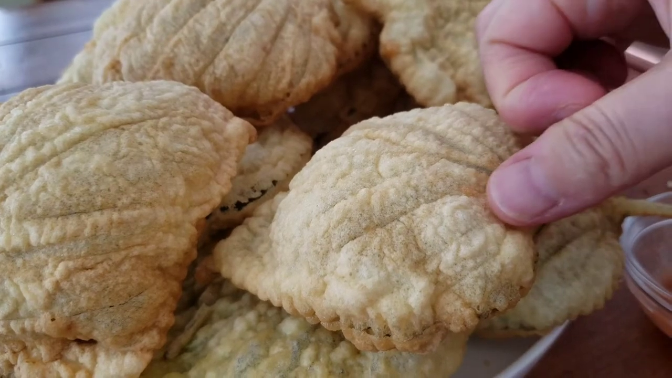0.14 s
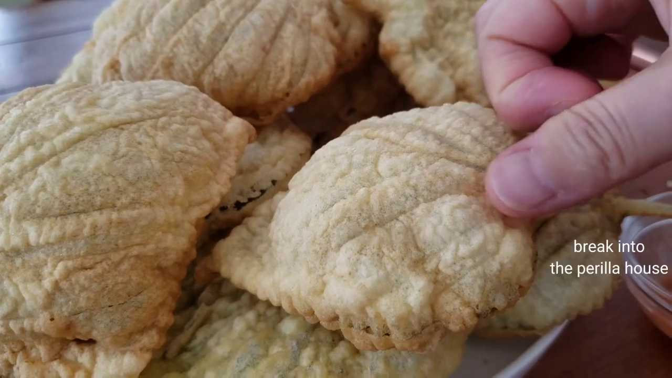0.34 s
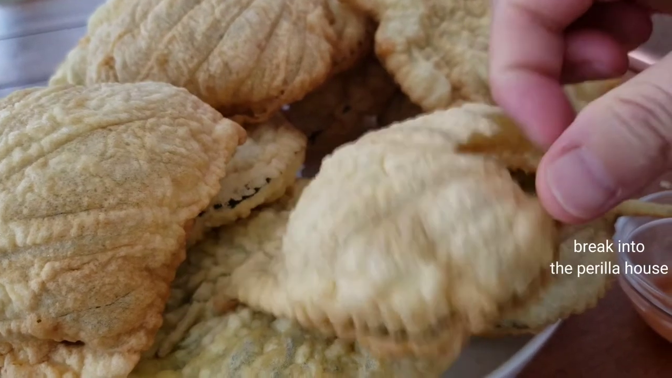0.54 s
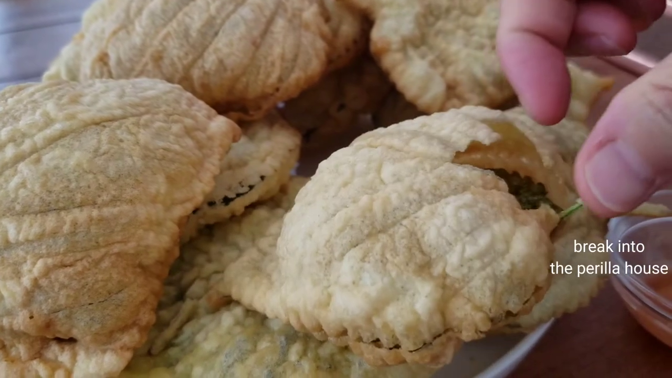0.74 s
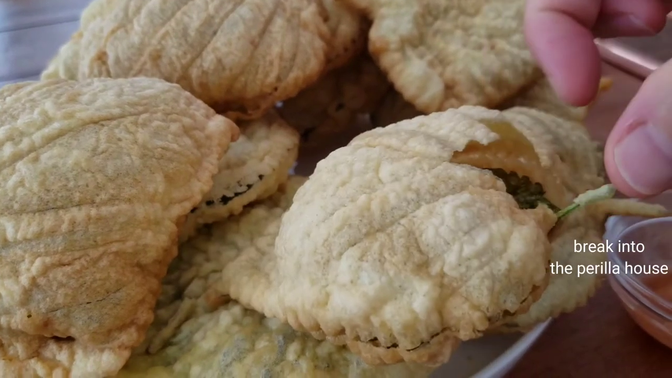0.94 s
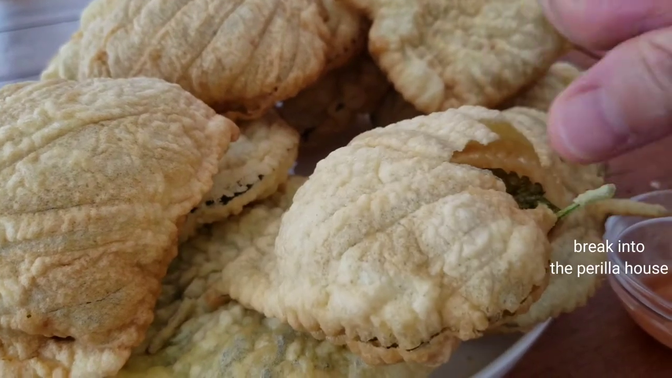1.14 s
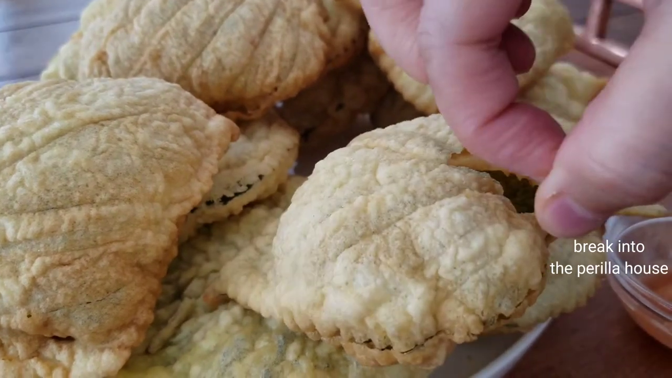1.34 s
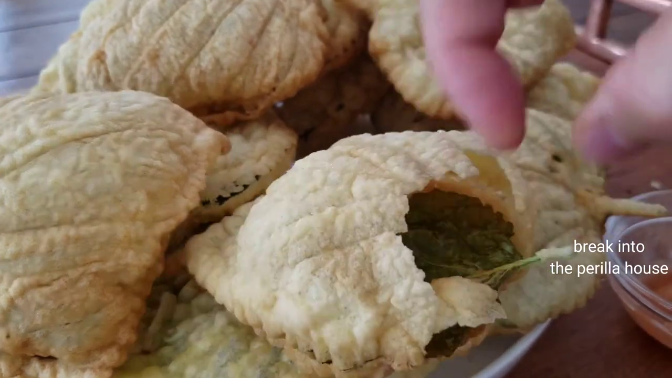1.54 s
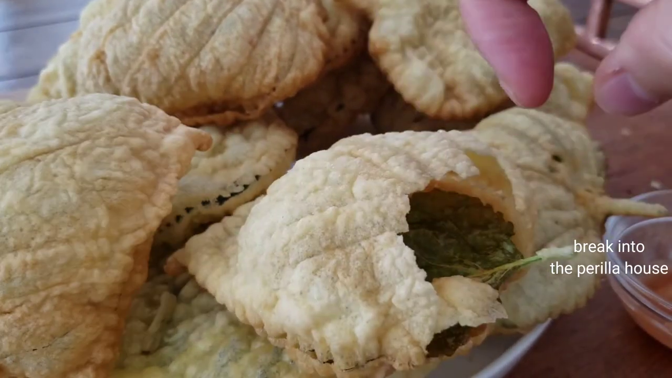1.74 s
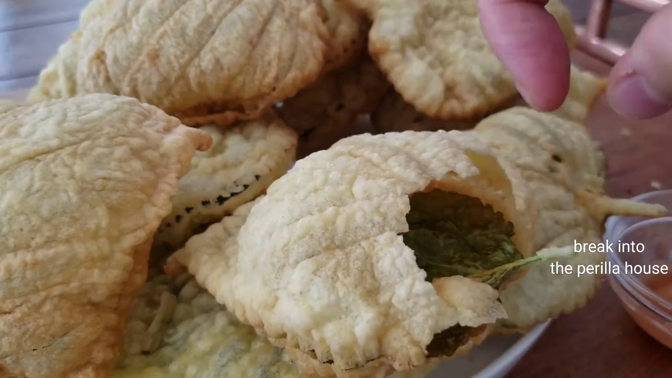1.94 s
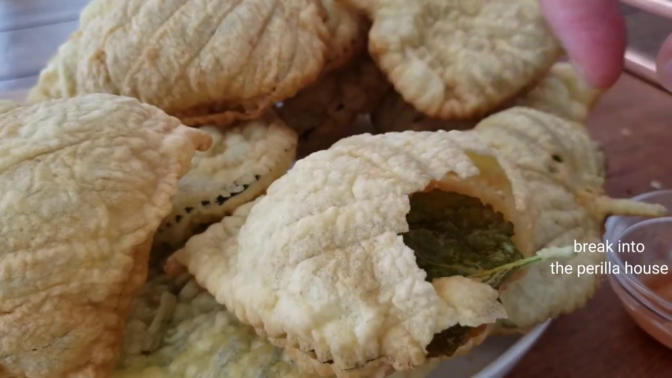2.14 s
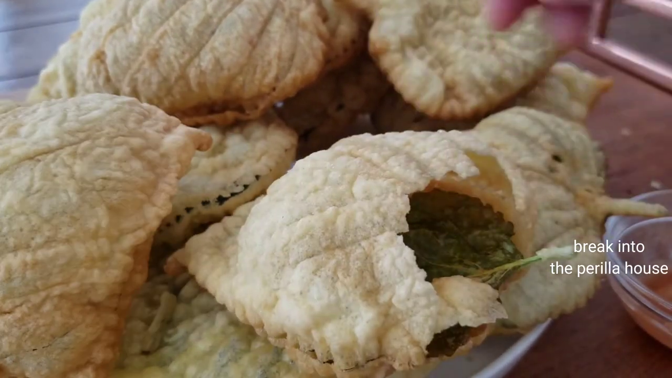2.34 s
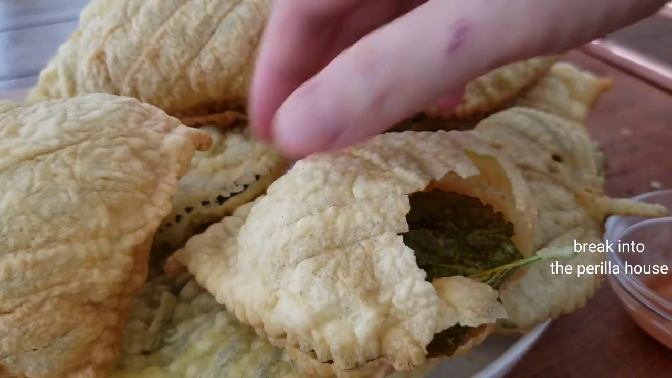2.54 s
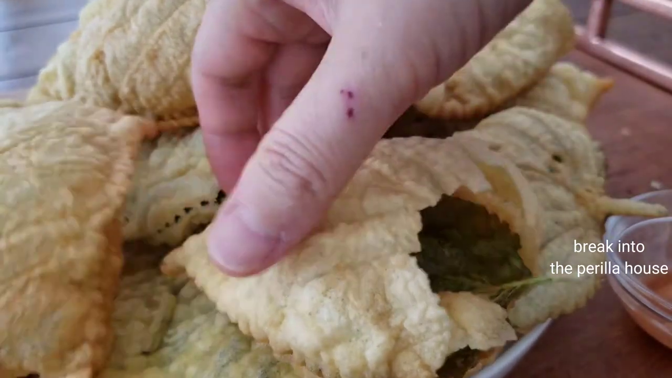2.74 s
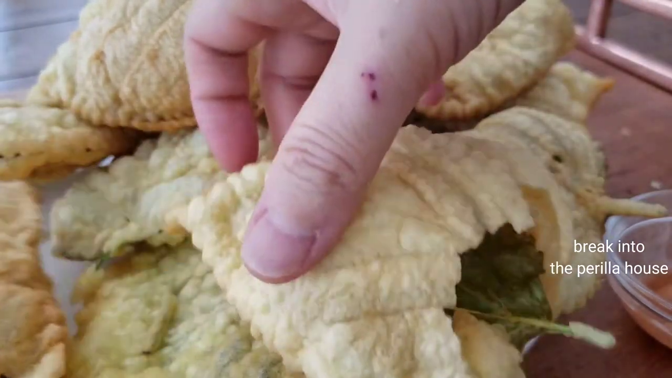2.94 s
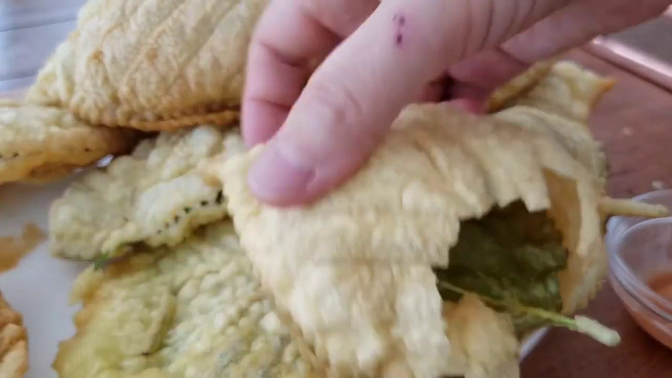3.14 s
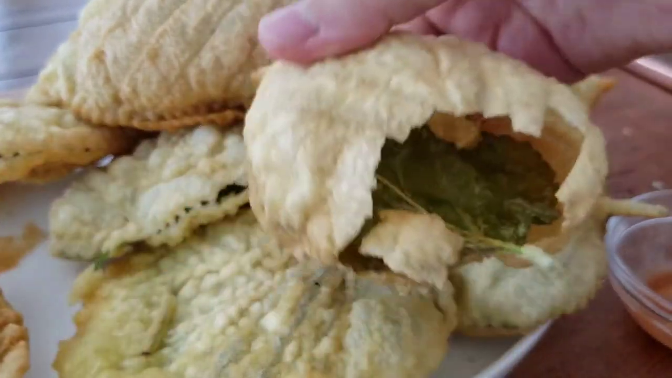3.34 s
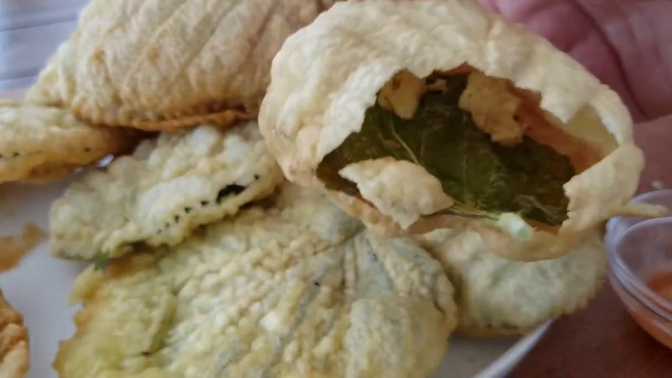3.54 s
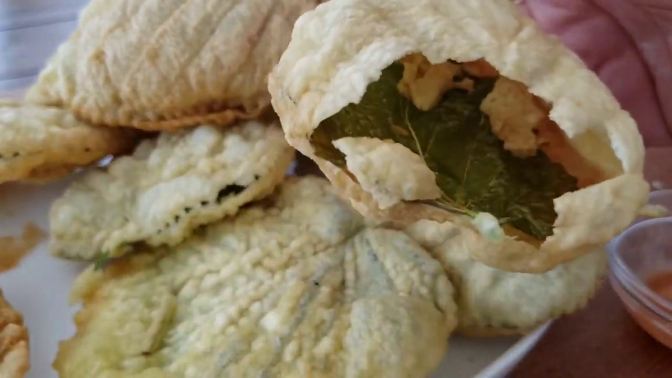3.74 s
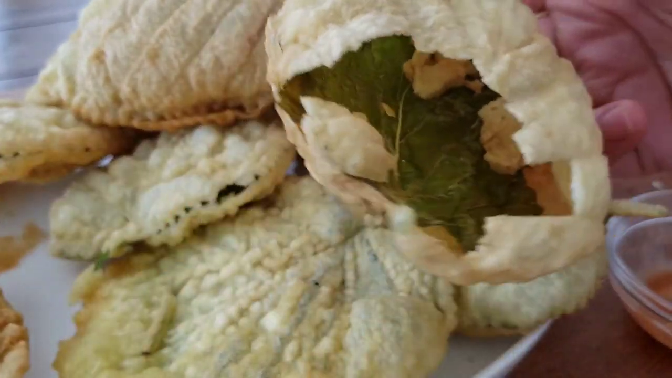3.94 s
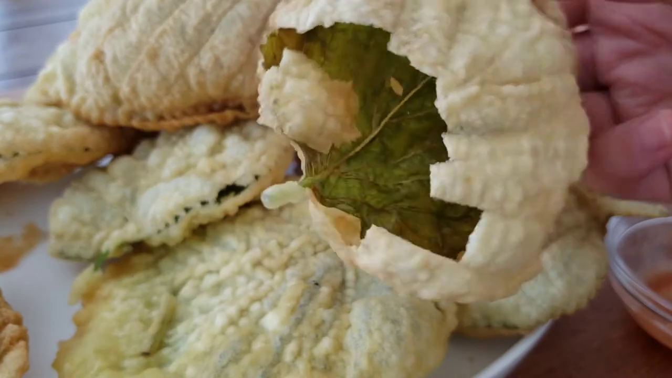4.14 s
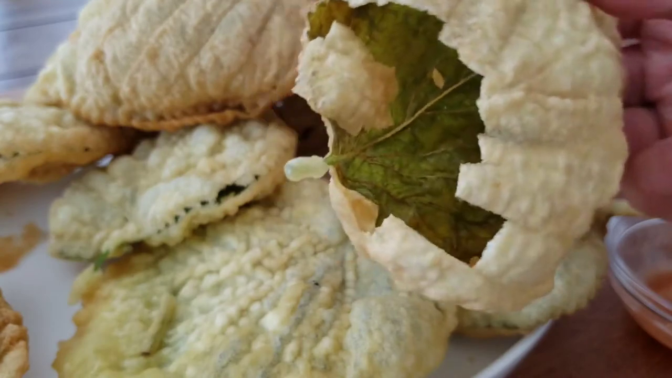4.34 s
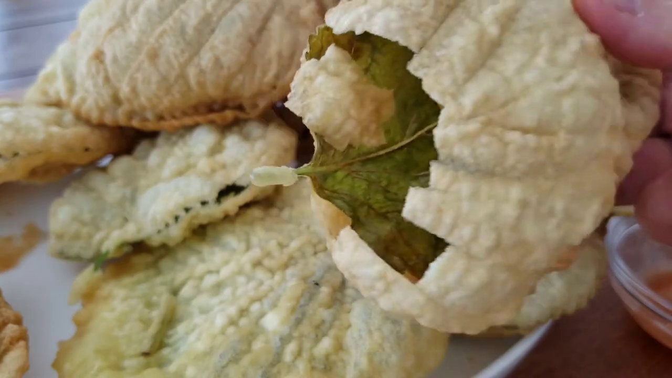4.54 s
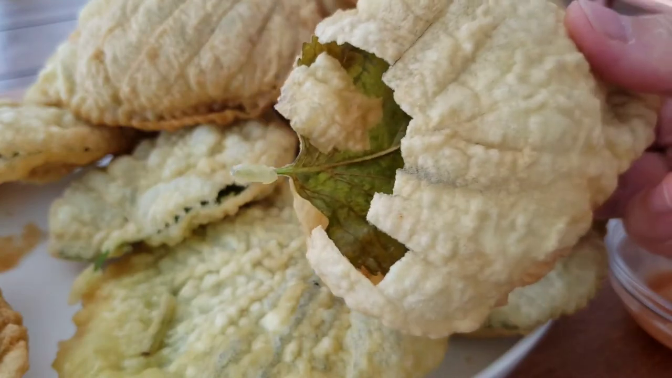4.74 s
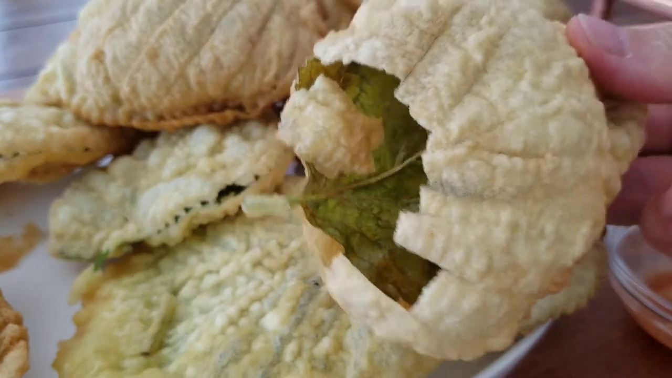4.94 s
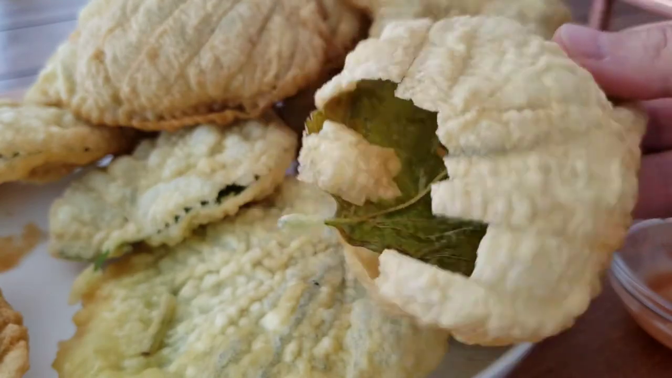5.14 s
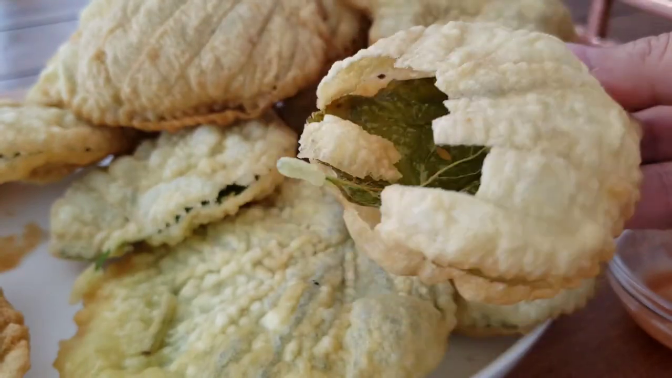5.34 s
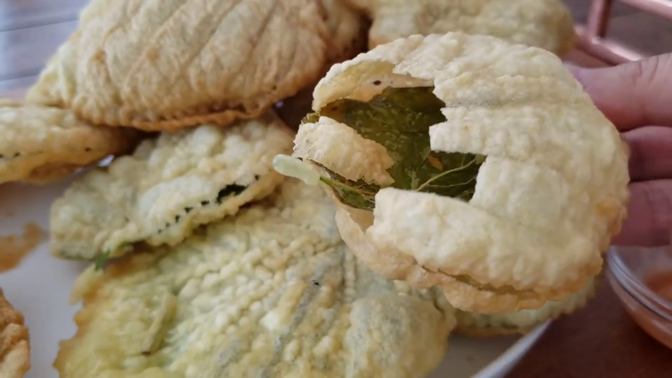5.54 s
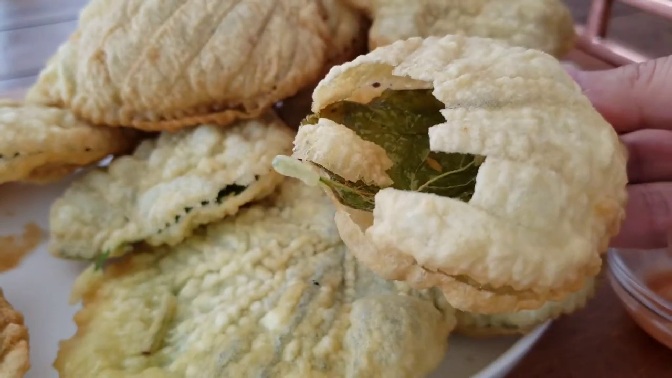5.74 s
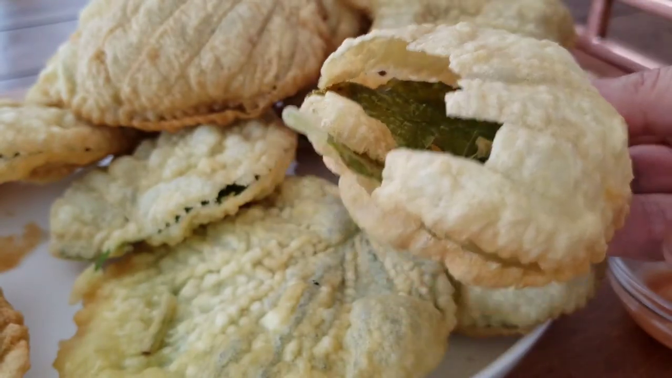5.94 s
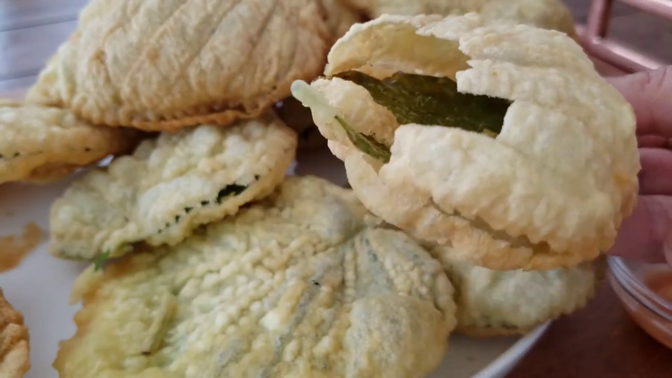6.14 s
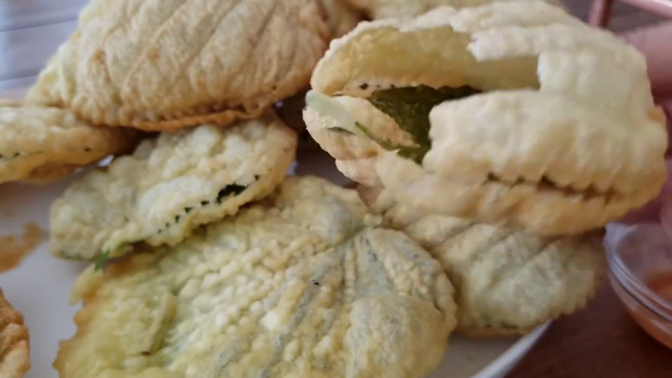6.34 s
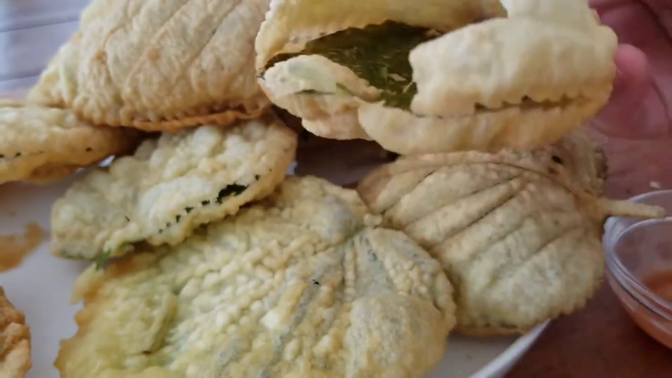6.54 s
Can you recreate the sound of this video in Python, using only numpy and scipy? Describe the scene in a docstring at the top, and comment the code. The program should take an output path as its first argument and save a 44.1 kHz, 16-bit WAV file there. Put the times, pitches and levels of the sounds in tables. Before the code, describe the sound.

Very close in a small room, fingers break a thin, hollow fried crust. After a quiet start comes a sharp crackling snap with a plate thud, then a much louder single crack. A dense run of softer hollow crunches and knocks follows as the piece is lifted away, then only faint fingertip scratches, over low hum, air rumble and hiss that become more noticeable after the first second.

```python
"""Breaking a hollow batter shell

Fingers break a brittle shell on a plate, lift it off the pile and turn it, close to a phone in a small room.
Cracks are noise volleys through a ring at the size of the piece; hollow knocks are short sines with a rattle.
Crunch and fingertip rub are grainy noise in swells; plate and table ring and boom as low sines and noise.
Fan tones, air rumble and hiss lie behind it all, quiet at first, then stepping up."""
import sys
import numpy as np
from scipy import signal
from scipy.fft import rfft, irfft
from scipy.io import wavfile

SR = 44100
rng = np.random.default_rng(int(sys.argv[2]) if len(sys.argv) > 2 else 0)


def file_out(sig):
    """Save sig as 16-bit WAV at sys.argv[1]."""
    # one column per channel
    cols = np.atleast_2d(sig).T
    # limit, then scale
    lim = np.clip(cols, -1, 1)
    pcm = np.round(lim * 32767).astype(np.int16)
    wavfile.write(sys.argv[1], SR, pcm)


N = 295029


def undb(db):
    """Amplitude factor of a level in dB."""
    return 10 ** (np.asarray(db) / 20)


def unit(x):
    """Scale to an rms of 1."""
    return x / np.sqrt(np.mean(x ** 2))


def sides(pan_db):
    """Left and right gains whose levels differ by pan_db (left minus right)."""
    return undb(np.array([pan_db, -pan_db]) / 2)


def colour(x, table):
    """Causal minimum-phase filter from (hz, db) points; white noise keeps its rms."""
    hz, db = np.transpose(table)
    grid_hz = np.maximum(np.arange(2049) * SR / 4096, 1)
    curve_db = np.interp(np.log(grid_hz), np.log(hz), db, left=-70, right=-70)
    # folding the cepstrum onto positive times makes the filter causal
    cepstrum = irfft(curve_db * np.log(10) / 20)
    cepstrum[1:2048] *= 2
    cepstrum[2049:] = 0
    taps = irfft(np.exp(rfft(cepstrum)))[:2048]
    taps /= np.sqrt(np.sum(taps ** 2))
    return signal.oaconvolve(x, taps[None], axes=1)[:, :N]


def ring(x, hz, width_hz):
    """One resonance, a pole pair with zeros at both band ends; white noise keeps its rms."""
    r = np.exp(-np.pi * width_hz / SR)
    gain = np.sqrt((1 - r * r) / 2)
    return signal.lfilter([gain, 0, -gain], [1, -2 * r * np.cos(2 * np.pi * hz / SR), r * r], x)


def walk(rate, t):
    """Random levels 1 / rate s apart, joined by straight lines and read at times t; spread near 1."""
    count = int(N / SR * 60) + 9
    return 1.1 * np.interp(t * rate, np.arange(count), rng.standard_normal(count))


def pair(shape, alike):
    """Noise at two microphone ports; alike is the share of power they have in common."""
    common, left, right = rng.standard_normal((3,) + shape)
    return np.sqrt(alike) * common + np.sqrt(1 - alike) * np.array([left, right])


def fade(t, rise_s, t60_s):
    """Soft onset times a decay of 60 dB in t60_s."""
    return (1 - np.exp(-t / rise_s)) * np.exp(-np.log(1000) * t / t60_s)


def swell(s, rise_ms, fall_ms, flat=0.9):
    """Span and gain of a burst around its peak; flat over 1 rounds the top and steepens the ends."""
    rise_s, fall_s = rise_ms / 1000, fall_ms / 1000
    at = slice(max(int((s - 3 * rise_s) * SR), 0), min(int((s + 3 * fall_s) * SR), N))
    t = np.arange(at.start, at.stop) / SR - s
    rise = np.abs(t / rise_s) ** (flat + 0.8)
    fall = np.abs(t / fall_s) ** flat
    return at, undb(-20 * np.where(t < 0, rise, fall))


def boom(table, split_hz):
    """Low noise that is the same at both ports in the deep bass and parts from the split upward."""
    mid, side = colour(rng.standard_normal((2, N)), table)
    side = signal.sosfilt(signal.butter(1, split_hz, "high", fs=SR, output="sos"), side)
    return np.array([mid + side, mid - side]) * sides(1.5)[:, None]


def fan():
    """Low fan tones wavering in level and phase, drawn on a coarse time grid and then filled in."""
    # fan tones: hz, base_level_db, left_minus_right_db, waver_db
    tones = [(74.2, -70, 2, 9), (116.4, -72.5, 1.5, 2.5), (147, -68, 3, 4.5), (184, -71, 1.5, 3.5),
             (228.3, -68, 5.5, 0), (254.3, -65, 3, 4), (282, -80.5, 3.5, 3), (330.8, -60, 14, 2.5),
             (363.5, -72, 6.5, -2), (403, -75, 6.5, 3), (434, -83, 3.5, 4), (473.6, -73, 9, 3),
             (527, -82.5, 8, 4.5), (655, -81.5, 5, 3.5)]
    step = 16  # samples
    t = np.arange(0, N + step, step) / SR
    total = 0
    for hz, db, pan_db, waver_db in tones:
        level = np.sqrt(2) * undb(db + waver_db * walk(14, t))
        turns = hz * t + rng.random() + 0.11 * walk(6.2, t)
        tone = level * np.exp(2j * np.pi * turns)
        # the tone arrives out of step left and right
        ports = sides(pan_db) * np.exp(1j * hz * np.array([0, .003]))
        total = total + (ports[:, None] * tone).real
    return signal.resample_poly(total, step, 1, axis=1)[:, :N]


def background():
    """Fan tones, wavering air rumble and steady microphone hiss under one common level curve."""
    # quiet at first, a step up with a brief gap in it, a sag after the loudest crack: time_s, gain_db
    level_curve = [(0, -8.5), (1.255, -10), (1.27, 0), (1.298, 3.5), (1.302, -8.5), (1.312, -10.5),
                   (1.318, 2), (1.6, -6), (2.0, -0.5), (2.6, -0.5), (3.5, -1.5), (4.5, 1), (5.5, 0),
                   (6.7, 0.5)]
    # spectrum of the air rumble: hz, relative_db
    air_colour = [(15, -27), (35, -5.5), (70, -5), (150, 0), (200, -10), (260, -6.5), (400, -13.5),
                  (520, -18.5), (620, -26.5), (1200, -35), (2000, -43)]
    # spectrum of the hiss: hz, relative_db
    hiss_colour = [(500, -3.5), (1500, -3.5), (4000, -6.5), (7000, -11), (8600, -17), (10500, -10),
                   (13000, -4), (15000, -3.5), (16500, -17.5)]
    t = np.arange(N) / SR
    air = undb(-58 + 3.1 * walk(13, t)) * boom(air_colour, split_hz=390.0)
    hiss = undb(-71.5) * colour(rng.standard_normal((2, N)), hiss_colour) * sides(3.0)[:, None]
    level_db = np.interp(t, *np.transpose(level_curve))
    return (fan() + air + hiss) * undb(level_db)


def plate():
    """Pushes on the pile rock the plate, and the table top booms as low noise."""
    # spectrum of the boom: hz, relative_db
    sway_colour = [(20, -19.5), (40, -6.5), (70, -3.5), (105, -0.5), (135, -2), (200, -9), (300, -8),
                   (450, -24.5)]
    # pushes: peak_s, rise_ms (over 20 dB), fall_ms (over 20 dB), level_db
    pushes = [(.47, 27, 59.5, -44), (.52, 49, 799, -53.5), (1.3, 87, 600.5, -62.5),
              (1.5, 60.5, 89.5, -42.5), (1.67, 41, 250, -52.5), (2.38, 600, 600, -60), (2.83, 57, 895, -44),
              (3.12, 304, 115, -47), (3.27, 119, 32, -47), (3.37, 53, 46, -56)]
    push = np.zeros(N)
    for s, rise_ms, fall_ms, db in pushes:
        at, gain = swell(s, rise_ms, fall_ms)
        push[at] += undb(db) * gain
    return push * boom(sway_colour, split_hz=270.0)


def room(x):
    """Small room: a fading cloud of echoes, different at each port."""
    t60_s, first_echo_s, level_db = .28, .004, -10.5
    t = np.arange(SR // 3) / SR
    tail = rng.standard_normal((2, len(t))) * np.exp(-np.log(1000) * t / t60_s) * (t > first_echo_s)
    tail /= np.sqrt(np.sum(tail ** 2, axis=1, keepdims=True))
    return undb(level_db) * signal.fftconvolve(x, tail, axes=1)[:, :N]


def thuds():
    """Plate and table top ring as low decaying sines, alike at both ports."""
    # thuds: start_s, level_db (before the fade), pitch_hz, t60_s
    rings = [(.455, -21.5, 413, 0.032), (0.469, -34, 130, 0.37), (1.496, -18.5, 381, 0.045),
             (1.5, -42, 135.3, 0.61), (2.83, -57, 130, 0.46), (3.029, -33.5, 106, 0.34),
             (3.246, -33.5, 132, 0.22)]
    t = np.arange(SR // 2) / SR
    out = np.zeros((2, N + SR))
    for s, db, hz, t60_s in rings:
        start = int(s * SR)
        thud = np.sin(2 * np.pi * hz * t) * fade(t, 1.3 / hz, t60_s)
        out[:, start:start + len(t)] += undb(db) * thud
    return out[:, :N]


def knocks():
    """A piece gives way and rings its wall or air pocket: a short sine with a noisy rattle that outlasts it."""
    # knocks: start_s, level_db (before the fade), pitch_hz, left_minus_right_db
    hits = [(0.454, -13, 1840, 5), (0.458, -15, 1314, -5), (0.471, -26, 1350, 8.5),
            (0.482, -16.5, 1310, -1), (0.57, -26, 2120, 1), (0.592, -26, 743, 3), (0.612, -25, 1480, 6),
            (0.627, -30, 1420, 11), (0.639, -34, 1320, 1), (0.735, -43.5, 663, 4), (0.775, -45, 1263, 0),
            (0.809, -50, 1490, 6.5), (1.487, -14, 1414, 7), (1.494, -18, 1460, -14),
            (1.495, -2.5, 1495, 5.5), (1.501, -20, 1510, 4), (1.665, -37.5, 1980, 3), (2.671, -42, 530, 8),
            (2.692, -43.5, 1900, 12.5), (2.762, -31, 840, 3), (2.722, -48, 1180, 1), (2.789, -32, 1190, 12),
            (2.813, -30.5, 1034, -13), (2.823, -25, 870, 19), (2.834, -21, 806, 9.5),
            (2.844, -23.5, 875, -9), (2.85, -23, 520, 9), (2.881, -27, 581, 9), (2.887, -27, 835, 2),
            (2.908, -21, 746, 5), (2.982, -32, 975, 14), (3.014, -25.5, 930, 13), (3.032, -11, 658, 5.5),
            (3.052, -28, 920, 0), (3.068, -21.5, 550, 2), (3.151, -30.5, 820, 6), (3.19, -35, 1116, 8.5),
            (3.257, -35.5, 1450, 0), (4.38, -46, 1490, 1), (4.395, -50, 657, 14.5),
            (6.534, -41, 1815, -5.5), (6.549, -40, 1883, 0.5)]
    full_scale_t60_s, longer_per_db = .016, .012
    size = SR // 12
    t = np.arange(size) / SR
    lag_s = np.array([[0], [.00008]])  # the clean ring reaches the right port later
    out = np.zeros((2, N + SR))
    for s, db, hz, pan_db in hits:
        # a hard knock breaks the piece and cuts its ring short
        t60_s = full_scale_t60_s * (1 - longer_per_db * db)
        clean = -np.sin(2 * np.pi * hz * (t - lag_s)) * fade(t, .0011, t60_s)
        rattle = ring(pair((size,), 0.1) * fade(t, .0014, 1.5 * t60_s), hz, .35 * hz)
        start = int(s * SR)
        out[:, start:start + size] += undb(db) * (clean + 0.52 * rattle) * sides(pan_db)[:, None]
    return out[:, :N]


def grains(scatter_db, clump_db):
    """Loudness of fractures a millisecond long: uneven, and in clumps."""
    size = np.minimum(rng.exponential(size=N // 44 + 1), 4.2).repeat(44)[:N]
    return unit(undb(scatter_db * size + clump_db * walk(50, np.arange(N) / SR)))


def piece(x, hz):
    """Ring of one piece of wall: two equal resonances in a row give steep flanks; noise keeps its rms."""
    width_hz = .3 * hz
    return ring(ring(x, hz, width_hz), hz, width_hz) * np.sqrt(2 * np.pi * width_hz / SR)


def cracks(snap, sizzle, focus, sizzle_lean):
    """Sharp cracks: a quick volley of fractures that thins out, brightest at the size of the piece."""
    # cracks: start_s, snap_db (before trims), snap_centre_hz, sizzle_db, left_minus_right_db
    breaks = [(0.4536, -13.5, 4060, -20.5, 5), (0.4556, -11, 3250, -26, 12), (0.4601, -14, 3680, -34, -3),
              (0.4834, -31.5, 3610, -43, -1), (0.57, -31, 3800, -37, 6), (0.6034, -28.5, 5300, -40, 1),
              (0.6115, -35, 3900, -49, 0), (0.6893, -40.5, 3920, -57, 0), (0.7064, -44, 3730, -57, 3),
              (0.7344, -53, 3500, -77, 8), (0.7757, -40, 6500, -58, 4), (0.808, -54, 5100, -74, -3),
              (0.8778, -53, 3600, -63, 3), (0.9056, -47.5, 3710, -55.5, 4.5), (0.9226, -47, 6710, -69, 6),
              (0.9583, -54.5, 7540, -74, 6), (1.483, -22.5, 5720, -30, -0.5), (1.49, -13, 3120, -22.5, 18),
              (1.494, -4, 3780, -12.5, 0.5), (1.497, -19, 3970, -19, 12), (1.6654, -24.5, 6670, -47, 4),
              (1.9712, -51.5, 2200, -80, 0), (2.5099, -34, 6820, -69.5, 1), (2.691, -62, 7120, -55.5, 8),
              (2.712, -46, 7250, -55.5, 5.5), (2.7278, -32.5, 6600, -38.5, 7), (2.794, -38, 4580, -51, 3.5),
              (2.8102, -29, 4850, -41.5, 6), (2.8829, -25.5, 4070, -28, 9.5), (2.9087, -23, 2880, -33, 11),
              (3.0162, -33, 2400, -50, 12), (3.033, -42, 3000, -52, 2.5), (3.0656, -31, 3150, -55, 12),
              (3.0774, -33.5, 3800, -49, 6), (3.141, -55, 2690, -63, 21), (3.2021, -53, 6900, -60, 0),
              (3.257, -50, 2600, -68.5, 13), (4.3797, -42, 4200, -49, 7.5), (4.3964, -44, 4520, -38.5, 14),
              (4.427, -51, 7300, -52.5, 3), (5.04, -51, 3060, -66.5, -3), (6.538, -47, 6030, -54, 10)]
    size = SR // 16
    t = np.arange(size) / SR
    for s, snap_db, hz, sizzle_db, pan_db in breaks:
        at = slice(int(s * SR), int(s * SR) + size)
        pan = sides(pan_db)[:, None]
        volley = pair((size,), 0.11) * fade(t, rise_s=.0003, t60_s=.024)
        # a small piece gives little sound far below its own ring
        thin = signal.lfilter(*signal.butter(2, .55 * hz, "high", fs=SR), volley)
        snap[:, at] += undb(snap_db - 8.0) * thin * pan
        focus[:, at] += undb(snap_db - 10) * piece(volley, hz) * pan
        sizzle[:, at] += undb(sizzle_db) * volley * sides(sizzle_lean * pan_db)[:, None]


def crunch(snap, sizzle, focus, shell, pocket, sizzle_lean):
    """Dense crunch and fingertip rub: grainy noise swelling and falling, each burst on one piece."""
    # bursts: peak_s, rise_ms (over 20 dB), fall_ms (over 20 dB), snap_db, snap_centre_hz,
    # wall_db, wall_centre_hz, pocket_db, sizzle_db (levels before trims)
    bursts = [(0.455, 5, 31, -25, 6400, -25.5, 1276, -30, -29.5),
              (0.484, 17, 157, -45, 3620, -39.5, 1480, -47.5, -48),
              (.615, 50, 61, -51, 2300, -46, 1460, -49.5, -54.5),
              (.697, 42, 120, -68.5, 3930, -62, 1260, -66, -69.5),
              (.81, 44, 53, -79, 5040, -73.5, 1460, -69.5, -77),
              (.915, 25, 59, -74.5, 3620, -83, 1280, -82.5, -71.5),
              (.93, 23.5, 60, -72.5, 7100, -93.5, 1021, -94.5, -78.5),
              (1.478, 7, 22, -40, 5000, -41, 1247, -65.5, -42.5),
              (1.494, 10.5, 29, -27, 3830, -23, 1440, -34, -26.5),
              (1.52, 19, 93, -51, 3530, -40, 1500, -42, -54),
              (1.6, 62, 73, -50, 2640, -44.5, 1410, -57.5, -58),
              (1.71, 66, 51, -50.5, 6280, -52, 1250, -52.5, -65),
              (1.775, 39, 40, -59, 7090, -62.5, 1186, -64.5, -78),
              (1.835, 25, 40, -74.5, 6460, -80.5, 1100, -88, -90),
              (2.015, 25, 34.5, -71.5, 6780, -79, 977, -90.5, -92),
              (2.41, 24.5, 51, -83.5, 3670, -95, 962, -89.5, -69),
              (2.53, 21, 39, -66, 4630, -87.5, 1247, -80.5, -80.5),
              (2.68, 9, 119.5, -53.5, 7100, -56.5, 1800, -56.5, -65.5),
              (2.733, 25, 90, -49, 7200, -48.5, 1290, -52, -57),
              (2.78, 57, 60, -53.5, 3200, -45, 1050, -50.5, -58),
              (2.827, 49, 53, -47, 4840, -38.5, 990, -41.5, -46),
              (2.9, 46, 84, -46.5, 3120, -39, 1030, -40, -49),
              (2.975, 60, 62, -52.5, 2960, -43, 1010, -47, -53.5),
              (3.03, 37, 27, -50, 2400, -42, 960, -39.5, -51),
              (3.069, 38, 54, -47, 3000, -45.5, 1650, -47, -50),
              (3.162, 44, 54, -55, 7100, -49.5, 1000, -50, -63),
              (3.204, 42, 47.5, -68, 2280, -57, 1120, -49, -69.5),
              (3.272, 22, 32, -77.5, 2800, -67, 1720, -63, -77),
              (3.395, 65, 67.5, -63, 5030, -61, 1204, -71.5, -64),
              (3.54, 33, 30, -85, 2283, -71, 1705, -85, -87),
              (3.667, 15.5, 15, -84, 2298, -72.5, 1450, -88, -85),
              (4.35, 26, 31, -68, 5440, -74, 1340, -78, -82),
              (4.395, 17, 63, -57.5, 7370, -63.5, 1575, -71.5, -68),
              (4.456, 43.5, 47, -58, 3700, -88, 1500, -90, -80),
              (4.459, 70, 74, -54, 5200, -71, 1503, -83, -56),
              (4.5, 24.5, 40.5, -62, 6520, -61, 1570, -91, -76.5),
              (4.575, 65.5, 60, -64, 2310, -59.5, 1720, -83, -73),
              (4.68, 84.5, 80, -78.5, 2294, -67.5, 1760, -88.5, -86),
              (4.752, 45, 25.5, -71, 2640, -69, 1244, -80, -79),
              (4.97, 48.5, 90, -67, 2300, -62.5, 1300, -80, -76),
              (5.05, 60.5, 57, -60, 3020, -56, 1800, -79, -66.5),
              (5.225, 29.5, 45, -80, 2300, -70, 1996, -83.5, -86),
              (5.447, 16, 17.5, -70, 6800, -88, 1228, -87, -87),
              (6.542, 18.5, 40, -56.5, 5970, -49.5, 1864, -55.5, -59)]
    lean_db = 5  # left minus right
    lean = sides(lean_db)[:, None]
    fine = pair((N,), 0.28) * grains(3.5, 1.6)
    coarse = pair((N,), 0.44) * grains(1.8, 1.7) * lean
    smooth = pair((N,), 0.074) * grains(1.8, 1.3)
    body = signal.butter(1, (1700, 3400), "band", fs=SR)
    for s, rise_ms, fall_ms, snap_db, snap_hz, wall_db, wall_hz, pocket_db, sizzle_db in bursts:
        # a light rub wakes one small piece and sounds narrow; a hard break sounds broad
        light_db = np.clip(.5 * (-52 - max(snap_db, wall_db)), 0, 9)
        at, gain = swell(s, rise_ms, fall_ms, flat=1.5 + .2 * light_db)
        # every piece reads fractures of its own from the noise
        shift = int(rng.random() * SR / 4) * (1 if s < 3 else -1)
        own = slice(at.start + shift, at.stop + shift)
        # a light rub hisses evenly, where a break crackles
        even = np.clip(light_db / 6.0, 0, 1)
        high = gain * (np.sqrt(1 - even) * fine[:, own] + np.sqrt(even) * smooth[:, own])
        low = gain * coarse[:, own]
        focus[:, at] += undb(snap_db - 6.0 + .51 * light_db) * piece(high, snap_hz) * lean
        focus[:, at] += undb(wall_db - 6.5 + 0.7 * light_db) * piece(low, wall_hz)
        # small pieces lack the lower part of the snap
        small = np.clip((snap_hz - 3500) / 1500, 0, 1) * np.clip(light_db / 3 + .4, 0, 1)
        bright = high - small * signal.lfilter(*body, high)
        snap[:, at] += undb(snap_db - 0.6 * light_db) * bright * lean
        sizzle[:, at] += undb(sizzle_db) * high * sides(sizzle_lean * lean_db)[:, None]
        shell[:, at] += undb(wall_db - 3.0 - 0.9 * light_db) * low
        pocket[:, at] += undb(pocket_db) * low


def wall():
    """The brittle wall breaking: broad layers take fixed colours, each piece adds its own narrow ring."""
    # broad snap of the wall: hz, relative_db
    snap_colour = [(1500, -19), (2200, -4.5), (2800, -2.5), (3500, 0), (4500, -2), (6500, -0.5),
                   (7600, 0.5), (8600, -17.5), (9500, -28.5)]
    # highest treble: hz, relative_db
    sizzle_colour = [(8000, -32), (9300, -8.5), (11000, -1.5), (12500, -0.5), (14000, -1.5), (15200, -1.5),
                     (16500, -11)]
    # hollow shell: hz, relative_db
    shell_colour = [(600, -22.5), (1000, -6), (1400, -0.5), (1900, -4), (2400, -5.5), (3200, -24)]
    # air pocket inside: hz, relative_db
    pocket_colour = [(200, -13), (350, -1), (600, 2), (850, -1.5), (1100, -8.5), (1600, -26)]
    sizzle_lean = .3  # the highest treble leans less to one side
    snap, sizzle, focus, shell, pocket = np.zeros((5, 2, N + SR // 16))
    cracks(snap, sizzle, focus, sizzle_lean)
    crunch(snap, sizzle, focus, shell, pocket, sizzle_lean)
    broad = colour(snap, snap_colour) + colour(sizzle, sizzle_colour)
    hollow = colour(shell, shell_colour) + colour(pocket, pocket_colour)
    return focus[:, :N] + broad + hollow


def scene():
    """Shell, knocks and thuds with their room echo, over the plate's boom and the background."""
    crust = wall() + knocks() + thuds()
    return crust + room(crust) + plate() + background()


def record(dry):
    """The phone softly rounds the very loudest peaks and cuts the top above 15.9 kHz."""
    rounded = dry / (1 + np.abs(dry / .9) ** 4) ** .25
    return signal.sosfilt(signal.ellip(8, .2, 70, 15900, fs=SR, output="sos"), rounded)


dry = scene()
out = record(dry)
file_out(out)
```